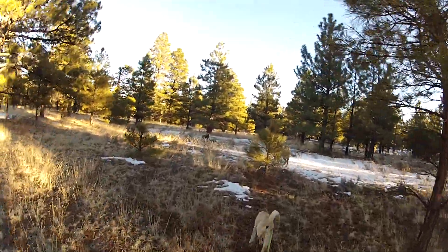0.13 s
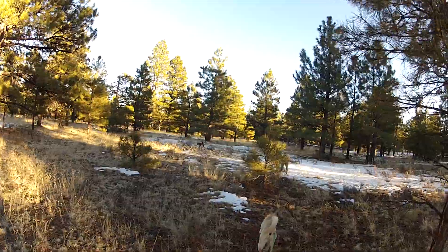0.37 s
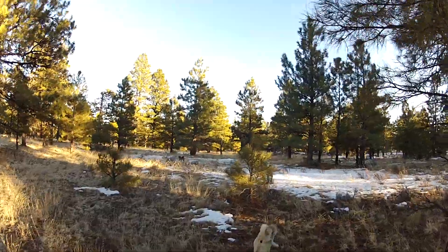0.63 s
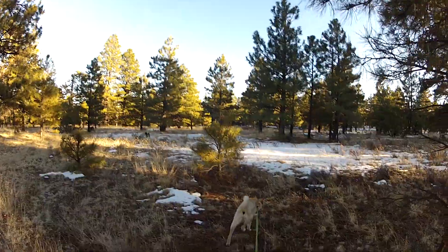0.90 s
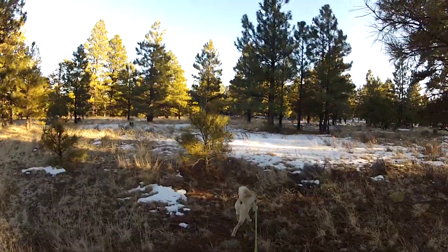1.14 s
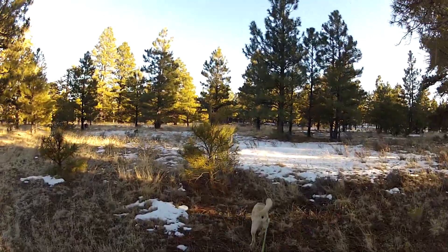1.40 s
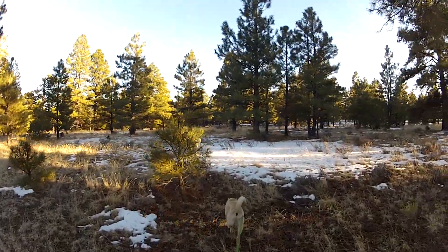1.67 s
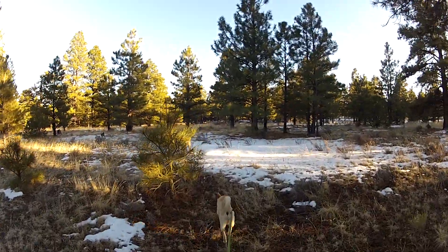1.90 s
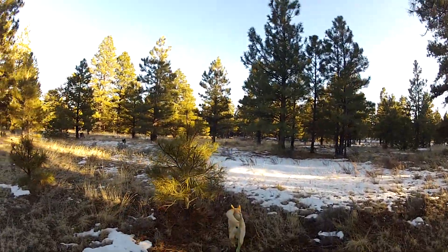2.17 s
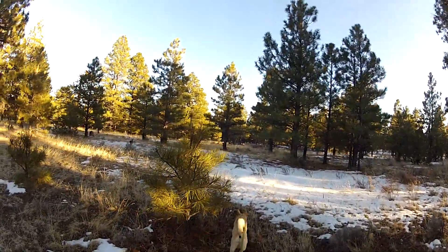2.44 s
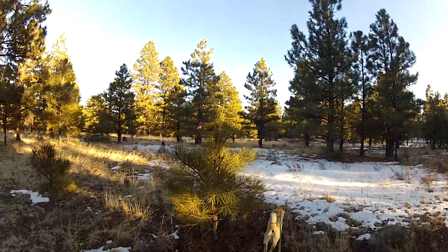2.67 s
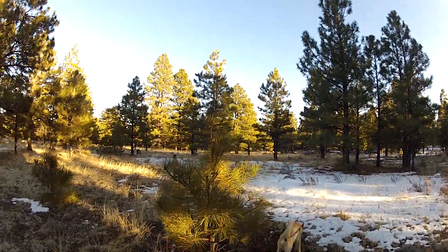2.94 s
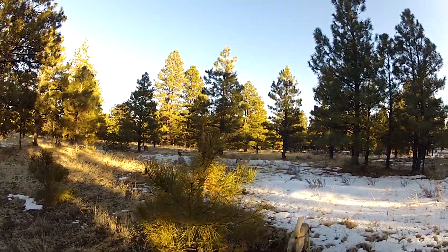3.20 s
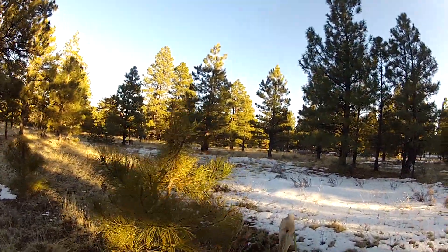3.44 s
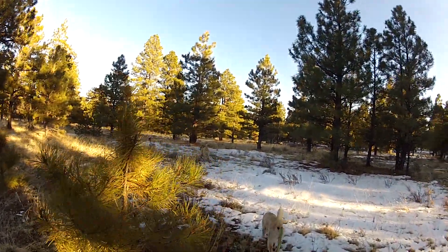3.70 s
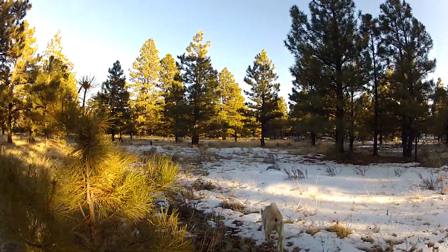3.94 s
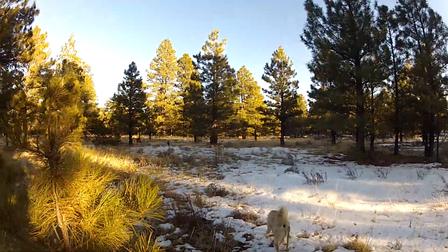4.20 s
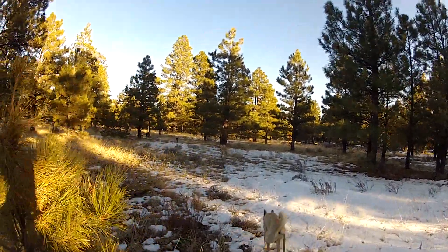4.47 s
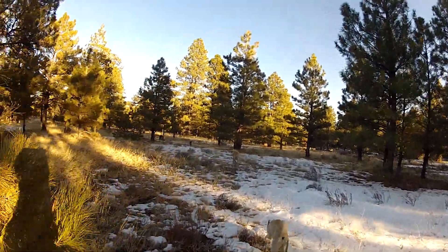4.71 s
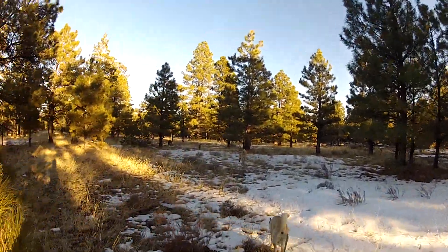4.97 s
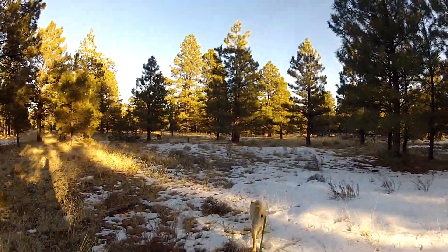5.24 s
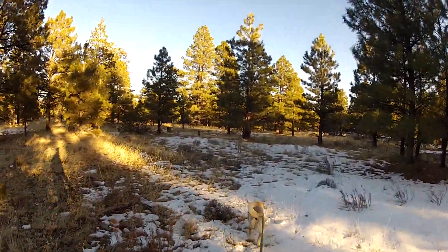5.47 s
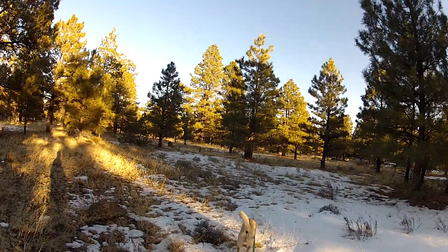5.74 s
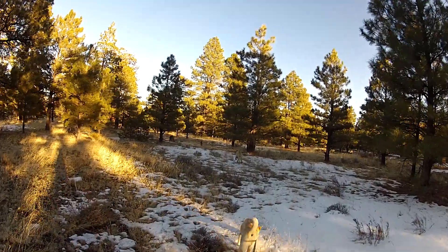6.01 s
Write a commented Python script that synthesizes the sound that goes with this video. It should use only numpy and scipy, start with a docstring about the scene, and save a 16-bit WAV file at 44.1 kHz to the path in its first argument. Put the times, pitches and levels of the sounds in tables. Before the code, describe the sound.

A walker's steady footfalls jolt a camera in a closed case: deep soft thuds, bright plastic ticks, dull knocks and faint hiss outdoors.

```python
"""Walking with a camera in a case

A walker crosses dry grass and thin snow with a small camera worn in a closed case.
Each footfall jolts the case: a deep thud, smaller jolts and a low shudder made of noise.
Loose parts tick, knock and brush: short bursts or noise passed through damped modes.
A small piece of metal rings faintly as a fading tone, over a steady hiss.
The recorder samples at 12 kHz and holds each sample, which mirrors the sound into the treble."""
import sys
import numpy as np
from scipy import signal
from scipy.fft import rfft, irfft
from scipy.io import wavfile
from scipy.ndimage import map_coordinates

SR = 44100
rng = np.random.default_rng(int(sys.argv[2]) if len(sys.argv) > 2 else 0)


def to_wav(s):
    """Save 16-bit WAV."""
    ch = np.atleast_2d(s).T  # columns
    pcm = np.round(np.clip(ch, -1, 1) * 32767)  # PCM
    wavfile.write(sys.argv[1], SR, pcm.astype(np.int16))


def invert_db(level):
    """Linear amplitude ratio for a level in decibels (20 dB per decade), elementwise."""
    return 10 ** (np.asarray(level, dtype=float) / 20)


N = 269892  # samples, about 6.1 s

# Footfalls: stop_s (the foot stops), level_db (peak of the sway),
# pitch_hz (sway up to its peak), rebound_db (against the sway)
FOOTFALLS = [(.669, -23.5, 28.5, -10), (1.201, -23, 30.6, -5), (1.782, -22.5, 31, -6),
             (2.355, -26.5, 25.8, -3.5), (2.925, -24, 28.5, -6), (3.54, -22.5, 28.4, -7),
             (4.064, -21.5, 28.8, -10), (4.662, -24, 28.8, -4), (5.268, -19.5, 32.6, -3),
             (5.849, -24, 32.7, -7)]
# Lesser jolts, as weight rolls to the toe and the legs swing: peak_s, level_db (top of the swell), pitch_hz
LESSER_JOLTS = [(.033, -36, 44), (.152, -35, 40.7), (.759, -35.5, 31), (.81, -39.5, 46), (1.09, -36, 47.7),
                (1.287, -30, 44), (1.42, -43, 59), (1.57, -42.5, 79.6), (1.659, -44, 45), (1.878, -35, 38),
                (2.22, -40, 31.7), (2.428, -33, 50), (2.474, -39, 56), (2.539, -39.5, 63),
                (2.627, -37.5, 68), (3.031, -36.5, 37), (3.393, -34, 43.7), (3.607, -31, 41.2),
                (3.687, -42.5, 50.3), (4.162, -34, 50.3), (4.49, -41.5, 42.7), (4.773, -40.5, 31.4),
                (5.393, -35, 45.4), (5.943, -35.5, 39.4), (5.977, -40.5, 44), (6.054, -41, 65.4)]
# Colour of the shudder: pitch_hz, level_db (per Hz, relative)
SHUDDER_SPECTRUM = [(12, -19), (22, 0), (40, -0.5), (70, -1.5), (110, -26.5), (200, -38.5), (400, -69)]
# Lulls of the shudder between footfalls: time_s, level_db (rms)
SHUDDER_LULLS = [(0, -40), (.31, -64.5), (.9, -48), (1.48, -63), (2.08, -57.5), (2.63, -55), (3.2, -63),
                 (3.78, -55.5), (4.42, -61.5), (4.95, -65), (5.63, -61), (6.12, -60)]
# Shudder around each footfall: lag_s (after the stop), level_db (rms against the sway's peak)
SHUDDER_SHAPE = [(-0.11, -28), (-0.036, -25), (0.03, -20), (0.1, -26)]
# A loose part ticking in the case: time_s, level_db (peak of the high modes), length_ms
TICK_TIMES = [(0.0227, -47, 1.1), (.0506, -45, 3.1), (.0939, -55, 1.4), (0.1307, -52, 1.7), (0.138, -46, 4),
              (.1424, -28, 1.7), (0.1486, -33.5, .82), (0.151, -42, .8), (.5659, -51, 1.2),
              (.6148, -60, 1.5), (.659, -36, .71), (.699, -48.5, 2.1), (1.1305, -40.5, 1.1),
              (1.176, -43.5, 1.7), (1.1944, -36.5, 3.6), (1.7485, -43.5, 3.3), (1.7712, -38, 1.7),
              (1.7752, -34, 7.2), (1.8675, -52.5, 2.1), (1.8732, -55, 1.1), (1.9783, -49.5, 1.8),
              (1.9872, -43.5, .95), (2.346, -51.5, 4.8), (2.3594, -57, 1.1), (2.5023, -53, 1.1),
              (2.5098, -32.5, 0.99), (2.5172, -57, 1.7), (2.8848, -50, 1.6), (2.922, -33, .78),
              (2.9552, -49.5, 1.8), (3.2336, -57, .9), (3.4089, -56, 1.3), (3.536, -55, 1.1),
              (3.5492, -48.5, 2.6), (3.524, -56, 1.3), (3.6662, -55, 1.4), (3.7034, -52, 1.9),
              (3.9426, -58, 1.3), (4.032, -40.5, 1.5), (4.0562, -31.5, 1.1), (4.06, -46, .74),
              (4.0919, -57, 1.4), (4.1439, -52, 1.3), (4.1503, -29.5, 1.2), (4.1534, -40, .65),
              (4.1589, -39, 1.3), (4.165, -42, .7), (4.4515, -58, 1.1), (4.6537, -46, 1.3),
              (4.6737, -53.5, 1.6), (4.8444, -52.5, 1.6), (4.9512, -55, 1.1), (5.2471, -38, 1.7),
              (5.2498, -35, .91), (5.2645, -38, 5.1), (5.288, -49, 1.1), (5.297, -47, 2.1),
              (5.3526, -41.5, 1.2), (5.357, -46, 0.8), (5.8452, -44.5, 1.5), (5.9204, -53, 1.2),
              (5.9315, -30.5, .66), (5.938, -40, 1.1), (5.941, -42, .7), (5.9644, -59, 1.1)]
# High modes of a tick: pitch_hz, width_hz, level_db (relative)
TICK_HIGH_MODES = [(5136, 594, -0.5), (4580, 740, -7.5), (3770, 71, -10.5), (3630, 360, -13)]
# Low modes of a tick: pitch_hz, width_hz, level_db (relative)
TICK_LOW_MODES = [(2045, 265, 5.5), (2450, 240, 5.5), (3165, 216, 4.5), (1340, 1100, -10)]
# Dull knocks on the case: time_s (middle of the push), shell_db (peak), thump_db (peak)
KNOCK_TIMES = [(.097, -52.5, -45), (0.215, -53.5, -50), (.81, -61, -48), (1.244, -53.5, -64),
               (1.275, -56, -54), (1.402, -50.5, -49), (1.564, -72, -48), (1.951, -56, -52),
               (2.353, -67, -42.5), (2.387, -53, -64), (2.404, -51, -64), (2.42, -50, -45.5),
               (2.513, -46.5, -45.5), (2.613, -73, -55), (2.954, -57, -53), (3.555, -57, -63),
               (3.677, -46.5, -48), (4.244, -55, -53), (4.84, -51, -52), (5.263, -64, -65),
               (5.892, -55, -71), (5.904, -49.5, -71), (5.924, -50.5, -45), (6.03, -51, -45.5)]
# Modes of the knocked shell: pitch_hz, width_hz, level_db (relative)
SHELL_MODES = [(1055, 156, 10), (1850, 78, 7), (2290, 420, -13), (1300, 400, -43)]
# Modes of the thump under a knock: pitch_hz, width_hz, level_db (relative)
KNOCK_THUMP_MODES = [(141, 67, -5.5), (293, 56, -10.5)]
# Something brushing past the case: peak_s, rise_s, fall_s, rub_db (rms at the peak), flutter_db (same)
BRUSH_STROKES = [(1.03, 0.1, 0.061, -52.5, -43.5), (2.188, 0.023, .018, -65, -66),
                 (2.29, .012, 0.042, -65, -63), (4.38, .06, 0.075, -70.5, -69),
                 (5.81, .018, 0.054, -61.5, -63), (5.904, 0.022, 0.011, -59.5, -59)]
# Modes of the brushed case: pitch_hz, width_hz, level_db (relative)
BRUSH_MODES = [(1060, 63, -4), (1716, 205, -1.5), (2350, 110, -1.5), (3020, 140, -2.5), (3730, 290, -10),
               (4420, 440, -6)]
# Colour of the brushing's low flutter: pitch_hz, level_db (per Hz, relative)
FLUTTER_SPECTRUM = [(40, -60), (65, 8), (100, 3.5), (150, -8.5), (250, -10.0), (400, -24.0),
                    (800, -33.5), (1600, -67)]
# A small piece of metal struck: start_s, level_db (before its rise, decay and flicker)
METAL_RINGS = [(.635, -77), (1.948, -67.5), (2.56, -71), (2.6, -76), (2.885, -74), (3.862, -68.5),
               (4.552, -70), (4.73, -76)]
# Open air and microphone: pitch_hz, level_db (per Hz, relative)
HISS_SPECTRUM = [(53, -24), (90, -1.5), (208, -3), (505, -12.5), (602, -14.5), (980, -18.5), (1190, -20),
                 (1520, -20.5), (4620, -26.5), (5320, -27.5), (5800, -29), (7540, -65), (12800, -120)]


def evened(x):
    """Scales a sound to rms 1."""
    return x / np.sqrt(np.mean(x ** 2) + 1e-20)


def peaked(x):
    """Scales a sound to peak 1."""
    return x / abs(x).max()


def add(mix, start_s, sound):
    """Adds a sound into the mix from a given time."""
    part = mix[max(round(start_s * SR), 0):][:len(sound)]
    part += sound[:len(part)]


def coloured(points, count):
    """Noise of rms 1 with the given spectrum."""
    point_hz, point_db = np.transpose(points)
    hz = np.fft.rfftfreq(count, 1 / SR)
    level_db = np.interp(np.log(hz + 1), np.log(point_hz + 1), point_db)
    white = rfft(rng.standard_normal(count))
    return evened(irfft(white * invert_db(level_db), count))


def wander(hz):
    """Slow chance of rms 1, up to about hz changes a second."""
    return coloured([(.3, 0), (hz, 0), (2 * hz, -40)], N)


def ring(x, modes):
    """Passes x through damped modes of alternating sign; a wider mode dies sooner."""
    out = np.zeros(len(x))
    for k, (hz, width_hz, db) in enumerate(modes):
        r = np.exp(-np.pi * width_hz / SR)
        feedback = [1, -2 * r * np.cos(2 * np.pi * hz / SR), r * r]
        out += (-1) ** k * invert_db(db) * signal.lfilter([1 - r, 0, r - 1], feedback, x)
    return out


def burst(length_s, rattle_db, rattle_s, creep_db):
    """A hard contact in a short scratch of noise 15 ms in, with a creeping start and a rattle behind it."""
    t = np.arange(SR // 20) / SR - .015
    skirt = invert_db(np.where(t > 0, rattle_db, creep_db)) * np.exp(-abs(t) / rattle_s)
    core = np.exp(-(t / length_s) ** 2)
    hit = (core + skirt) * rng.standard_normal(len(t))
    hit[abs(t).argmin()] += 5.0  # the contact itself
    return hit


def thuds():
    """The body dips and heaves, then settles more slowly; the sudden stop sets off a faster rebound."""
    lead_s, settling_pace = 0.0097, 0.797  # the heave peaks before the stop, then the sway slows
    rebound_hz, rebound_rise_s, rebound_t60_s = 66.6, 0.011, 0.14
    out = np.zeros(N)
    t = np.arange(-SR // 10, SR // 4) / SR  # 0 when the foot stops
    from_peak = t + lead_s
    settling = from_peak > 0
    width_s = np.where(settling, 0.021 / settling_pace, 0.025)
    bell = np.exp(-(from_peak / width_s) ** 2)
    swell = np.where(t < 0, np.exp(-(t / rebound_rise_s) ** 2), invert_db(-60 * t / rebound_t60_s))
    rebound = swell * np.sin(2 * np.pi * rebound_hz * t)
    for stop_s, db, hz, rebound_db in FOOTFALLS:
        sway_hz = hz * np.where(settling, settling_pace, 1)
        sway = np.cos(2 * np.pi * sway_hz * from_peak) * bell
        add(out, stop_s + t[0], invert_db(db) * (sway - invert_db(rebound_db) * rebound))
    return out


def jolts():
    """About one swing of the mount each, under a bell that is shorter for faster swings."""
    out = np.zeros(N + SR)
    for peak_s, db, hz in LESSER_JOLTS:
        turns = np.arange(-SR // 20, SR // 20) / SR * hz
        swing = np.cos(2 * np.pi * (turns + rng.random()))
        add(out, peak_s, invert_db(db) * swing * np.exp(-(turns / 0.47) ** 2))
    return out[SR // 20:][:N]  # puts the middle of each bell at its peak time


def shudder():
    """Lumpy low noise that swells with the leg swing, peaks at each footfall and settles to a lull."""
    around_steps = [(step[0] + lag_s, step[1] + db) for step in FOOTFALLS for lag_s, db in SHUDDER_SHAPE]
    time_s, db = np.transpose(sorted(SHUDDER_LULLS + around_steps))
    level_db = np.interp(np.arange(N) / SR, time_s, db)
    lumps_db = 1.5 * wander(17.0)
    return invert_db(level_db + lumps_db) * coloured(SHUDDER_SPECTRUM, N)


def ticks():
    """Plastic on plastic: hard, short and bright."""
    core_share = 0.44  # part of a tick's length taken by its hard core
    # The low modes grow more slowly than the high ones, so hard ticks are brighter.
    low_at_reference_db, reference_db = -55, -44.5
    low_growth, low_spread_db = 0.62, 2.5  # dB per dB, chance
    out = np.zeros(N)
    for time_s, db, length_ms in TICK_TIMES:
        hit = burst(core_share * length_ms / 1000, -7.5, 0.0028, -12.5)
        low_db = low_at_reference_db + low_growth * (db - reference_db)
        low_db += low_spread_db * rng.standard_normal()
        high = invert_db(db) * peaked(ring(hit, TICK_HIGH_MODES))
        low = invert_db(low_db) * peaked(ring(hit, TICK_LOW_MODES))
        add(out, time_s - .0157, high + low)
    return out


def knocks():
    """Softer blows reach only the low modes of the case, with a thump from a smooth push."""
    out = np.zeros(N)
    for time_s, shell_db, thump_db in KNOCK_TIMES:
        shell = peaked(ring(burst(0.00073, -7.5, 0.0029, -40), SHELL_MODES))
        push = np.pad(np.hanning(90), (530, len(shell) - 620))  # 2 ms long, centred 13 ms in
        thump = peaked(ring(push, KNOCK_THUMP_MODES))
        add(out, time_s - .013, invert_db(shell_db) * shell + invert_db(thump_db) * thump)
    return out


def brushes():
    """Friction noise in the body of the case, which also flutters; each stroke swells and dies as a bell."""
    out = np.zeros(N)
    t = np.arange(-SR // 5, SR // 5) / SR
    for peak_s, rise_s, fall_s, rub_db, flutter_db in BRUSH_STROKES:
        friction = rng.standard_normal(len(t))
        body = ring(friction, BRUSH_MODES) + invert_db(-15.5) * friction
        grain_db = 1.6 * coloured([(20, -7), (150, -18), (400, -1)], len(t))  # ragged
        rub = evened(body * invert_db(grain_db))
        flutter = coloured(FLUTTER_SPECTRUM, len(t))
        bell = np.exp(-(t / np.where(t < 0, rise_s, fall_s)) ** 2)
        add(out, peak_s + t[0], (invert_db(rub_db) * rub + invert_db(flutter_db) * flutter) * bell)
    return out


def rings():
    """A thin tone that starts quickly, flickers and dies away."""
    pitch_hz, rise_s, t60_s = 2830, 0.0041, 0.37
    out = np.zeros(N)
    t = np.arange(SR // 4) / SR
    tone = (1 - np.exp(-t / rise_s)) * np.sin(2 * np.pi * pitch_hz * t)
    for start_s, db in METAL_RINGS:
        add(out, start_s, invert_db(db - 60 * t / t60_s) * tone)
    return out * invert_db(3 * wander(40))


def air():
    """Steady hiss whose lower part wavers."""
    hiss = coloured(HISS_SPECTRUM, N)
    low = signal.sosfilt(signal.butter(2, 500, fs=SR, output="sos"), hiss)
    waver = invert_db(1.8 * wander(6.6)) - 1
    return invert_db(-62.5) * (hiss + waver * low)


def scene():
    """Adds the sounds of the case, the ringing metal and the air into one channel."""
    case = thuds() + jolts() + shudder() + ticks() + knocks() + brushes()
    return (case + rings() + air())[None]


def band_limit(x):
    """A steep low-pass at the top of the band."""
    return signal.sosfilt(signal.butter(12, 16420, fs=SR, output="sos"), x)


def record(dry):
    """Band limit, sampling at 12 kHz, each sample held four ticks of a 48 kHz clock, then a top cut."""
    sample_hz, limit_hz, top_hz = 12000, 5600, 15250
    limited = signal.sosfilt(signal.butter(14, limit_hz, fs=SR, output="sos"), dry)
    at = np.arange(N * sample_hz // SR + 1) * SR / sample_hz
    samples = map_coordinates(limited[0], [at], order=5, mode="nearest")
    held = np.repeat(samples, 4)
    held = signal.resample_poly(held, 147, 160)[None, :N]  # 48 kHz to 44.1 kHz
    top_cut = signal.firwin(401, top_hz, window=("kaiser", 7), fs=SR)
    mix = signal.oaconvolve(held, top_cut[None], "same")
    return band_limit(mix)


dry = scene()
out = record(dry)
to_wav(out)
```